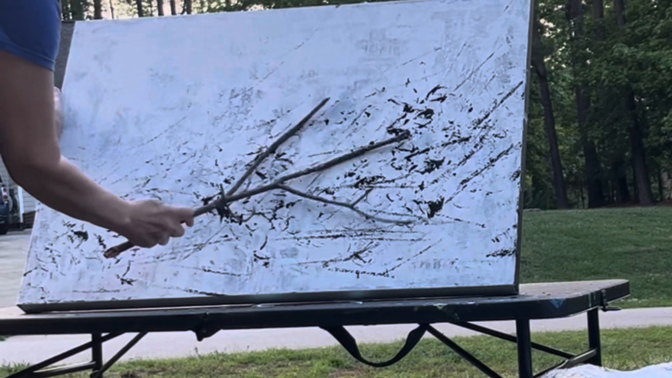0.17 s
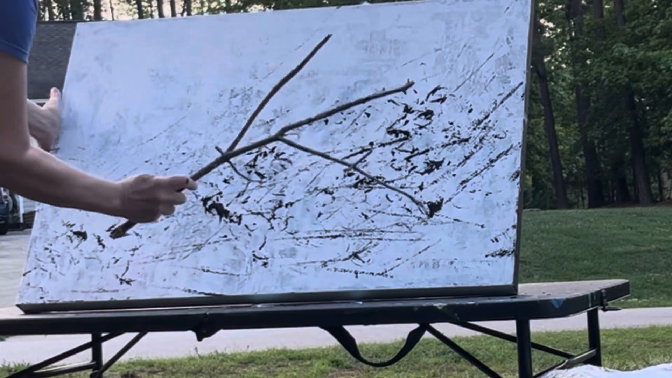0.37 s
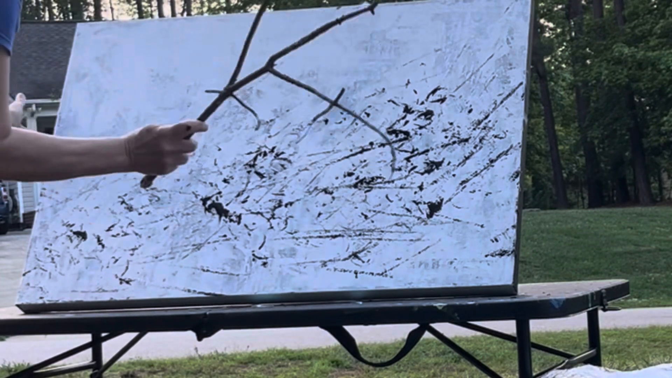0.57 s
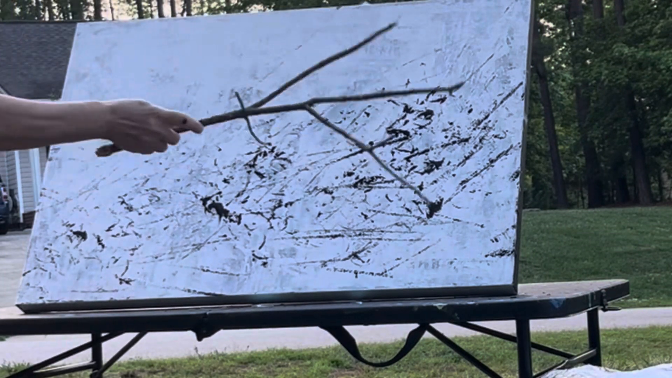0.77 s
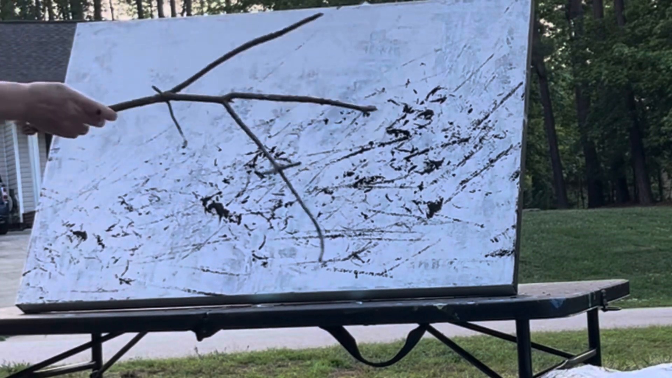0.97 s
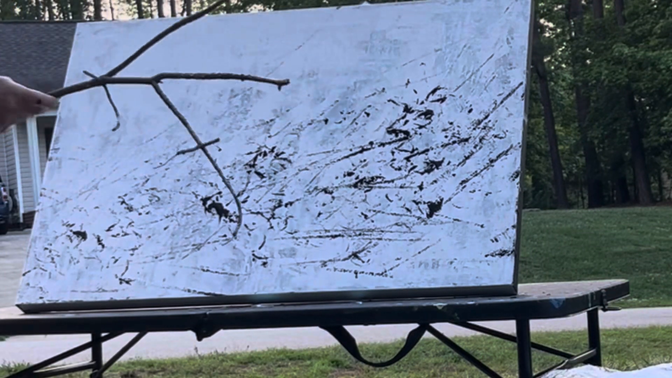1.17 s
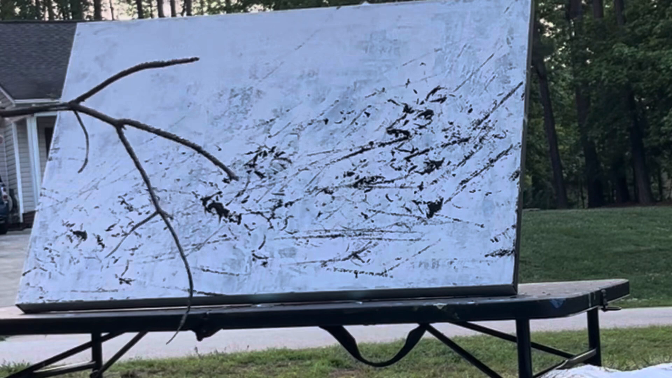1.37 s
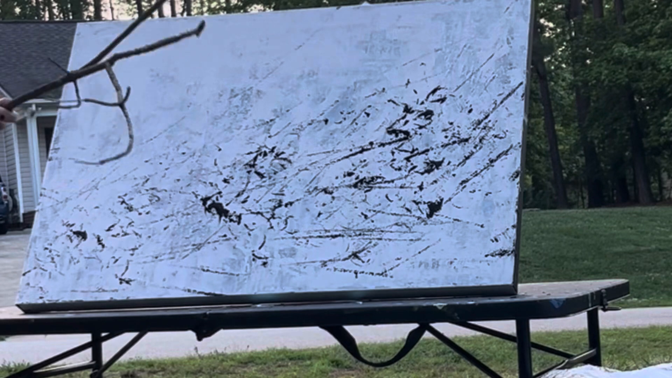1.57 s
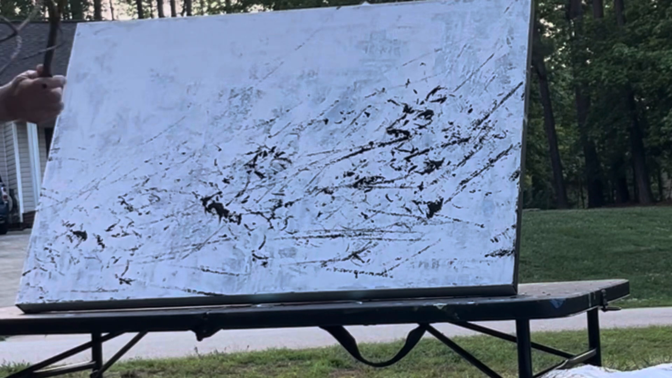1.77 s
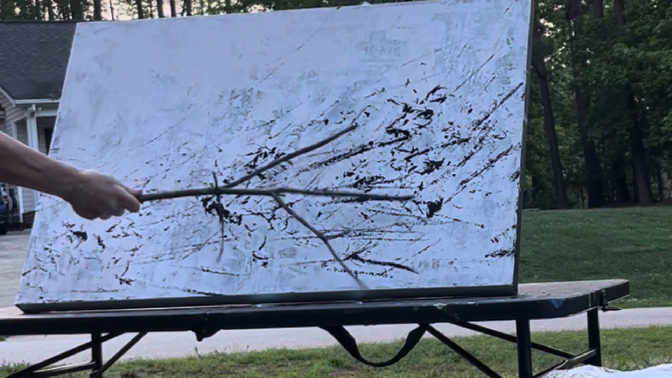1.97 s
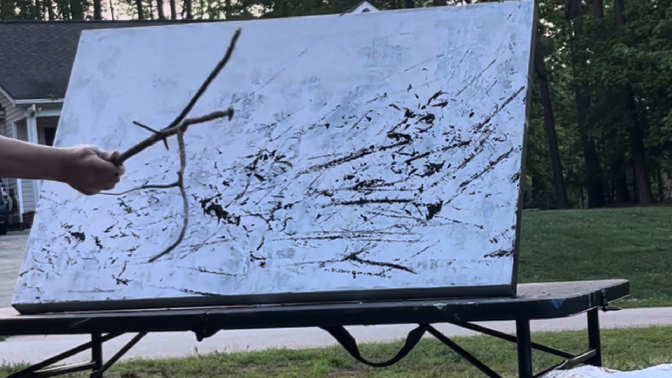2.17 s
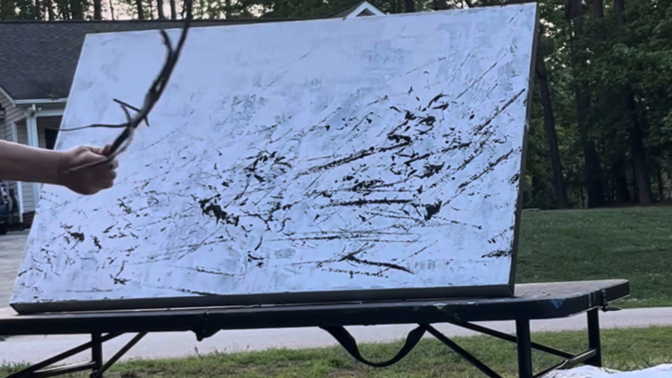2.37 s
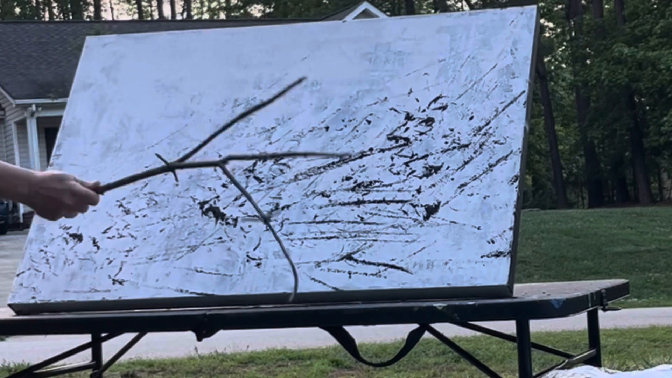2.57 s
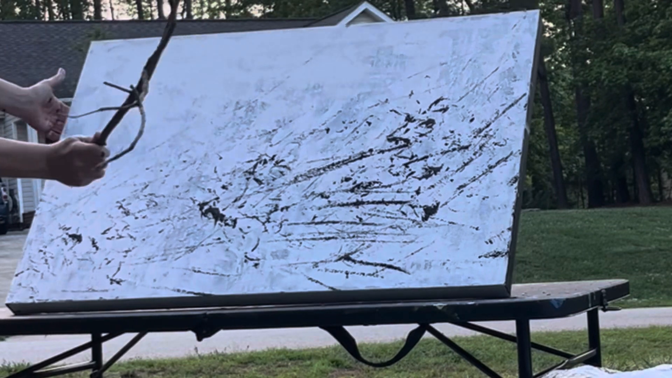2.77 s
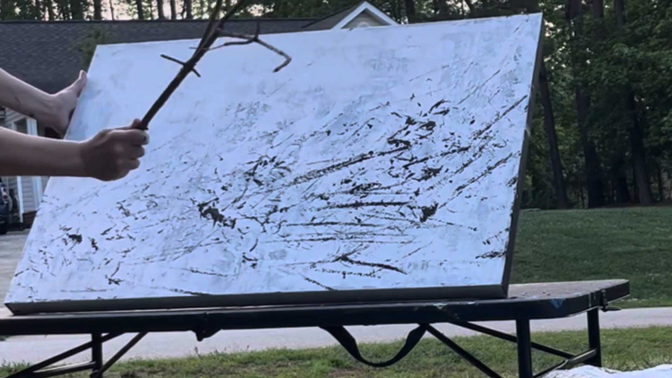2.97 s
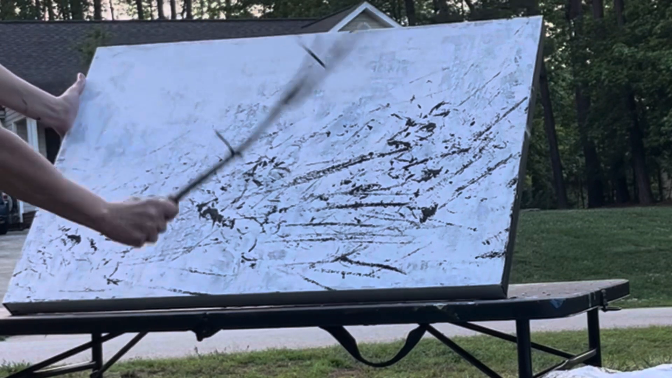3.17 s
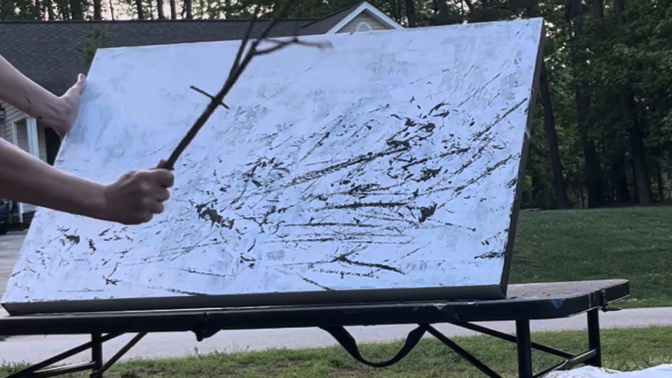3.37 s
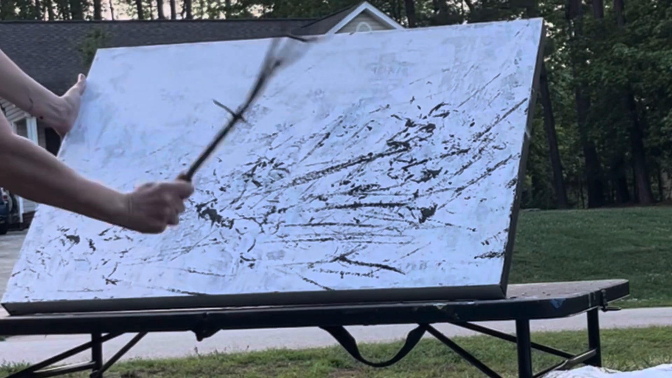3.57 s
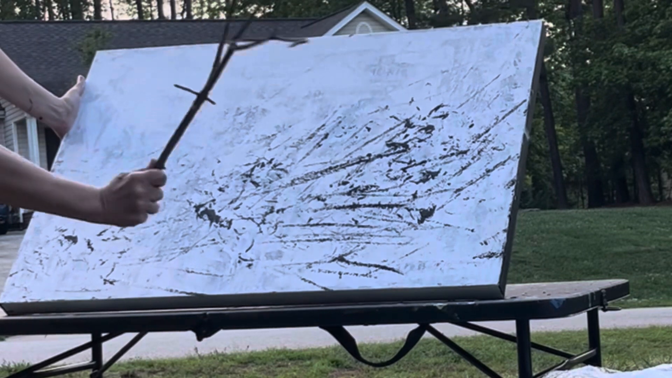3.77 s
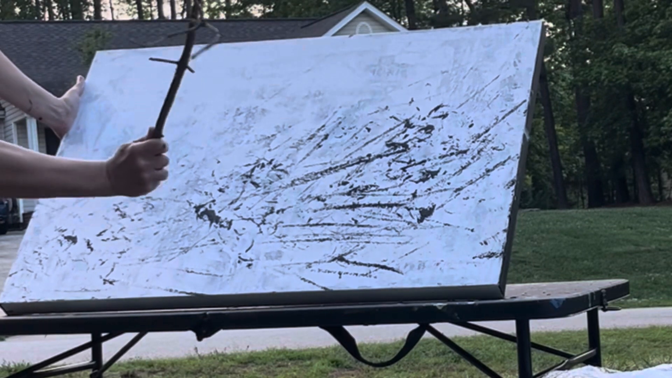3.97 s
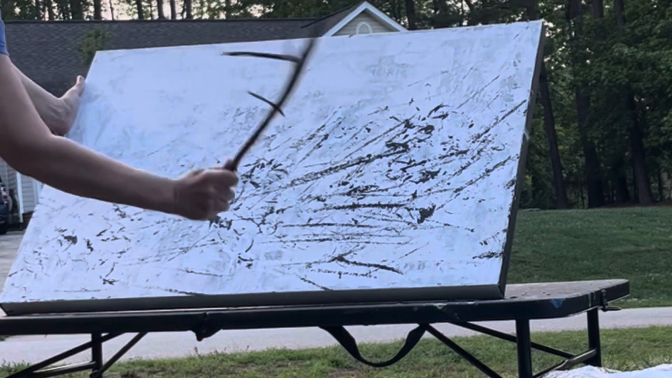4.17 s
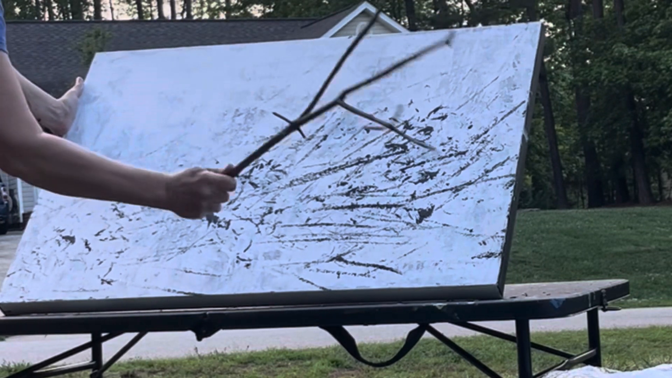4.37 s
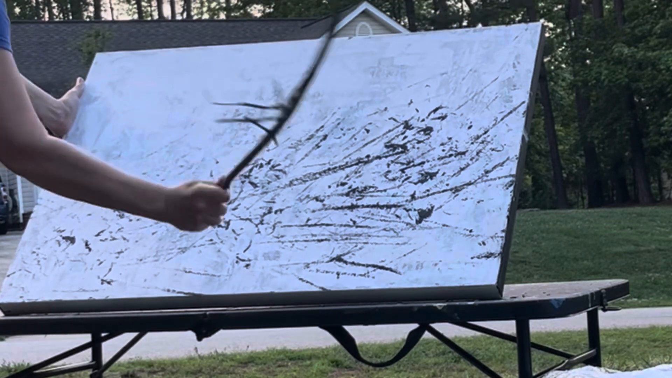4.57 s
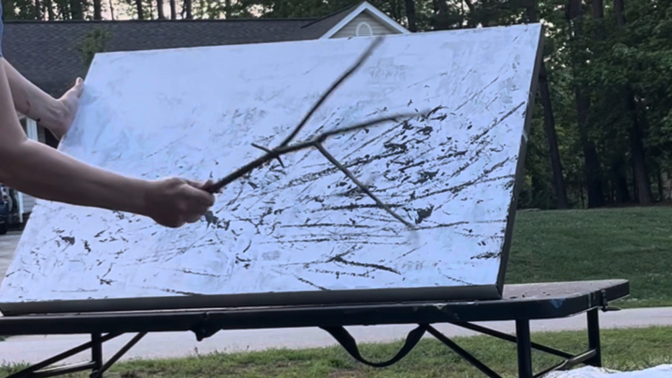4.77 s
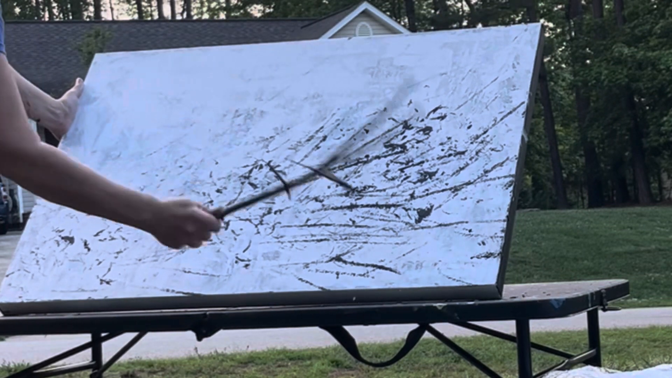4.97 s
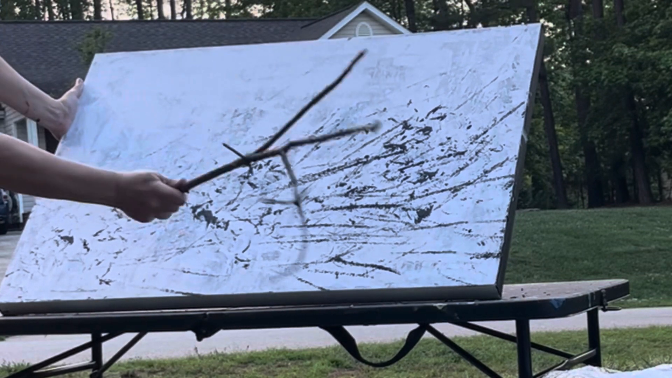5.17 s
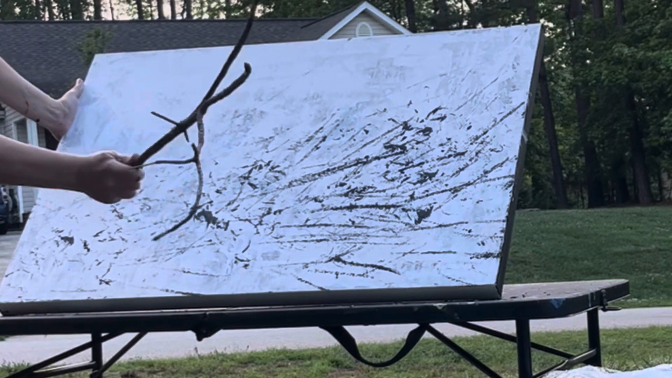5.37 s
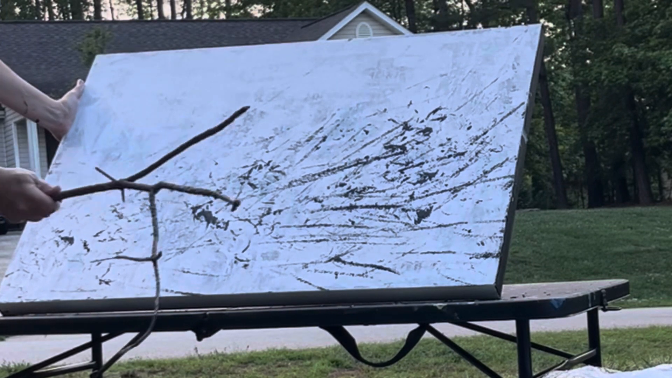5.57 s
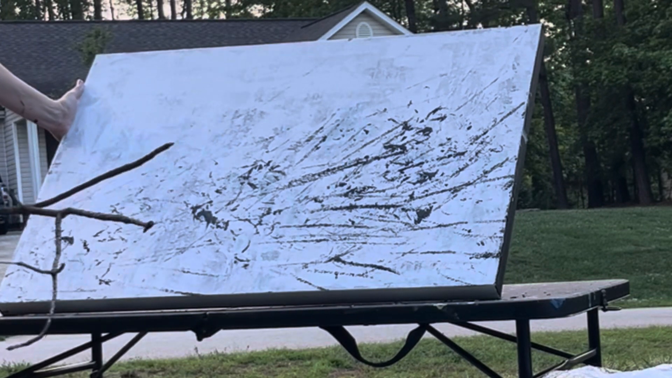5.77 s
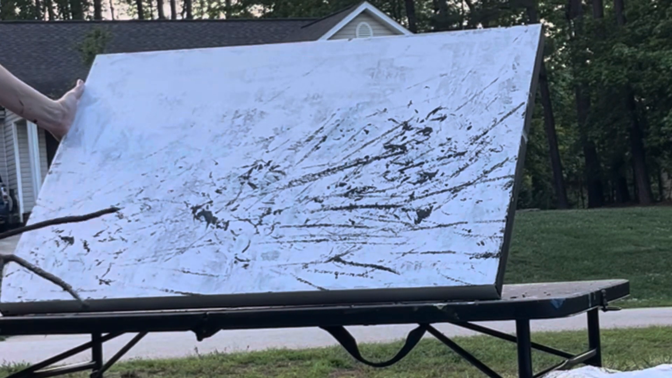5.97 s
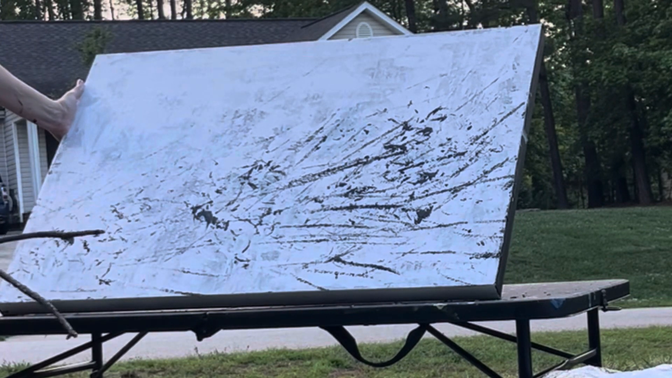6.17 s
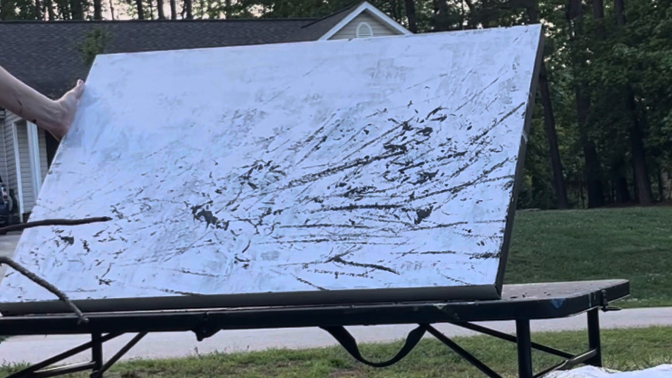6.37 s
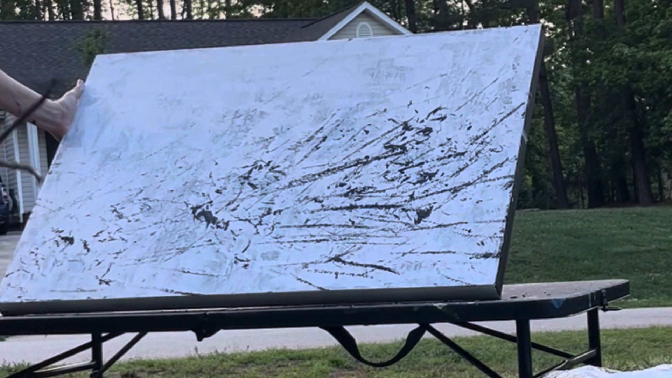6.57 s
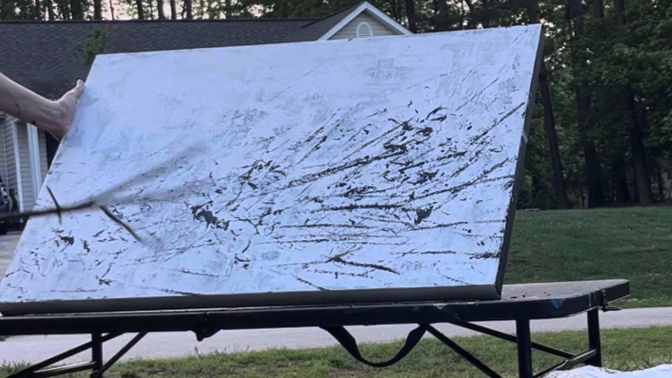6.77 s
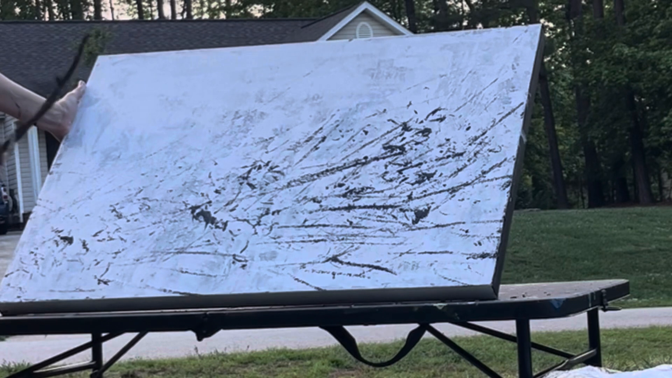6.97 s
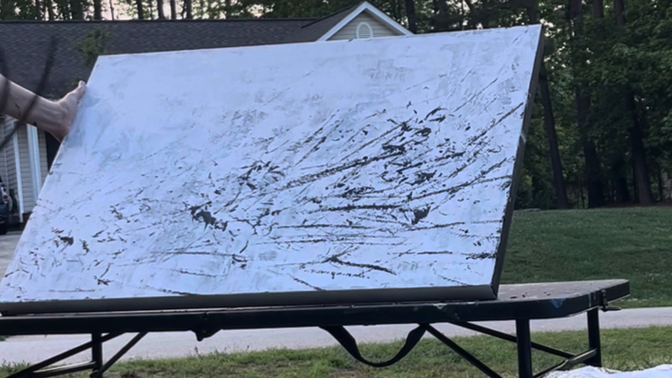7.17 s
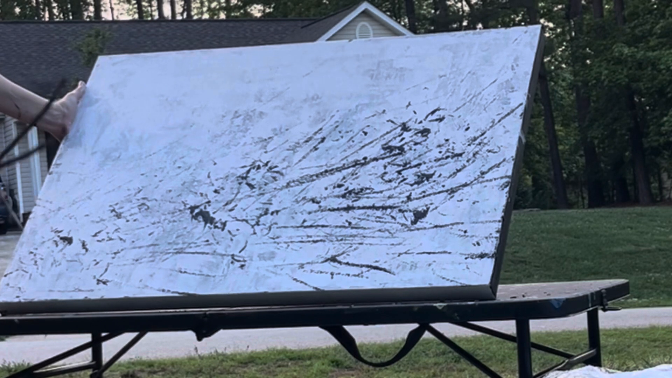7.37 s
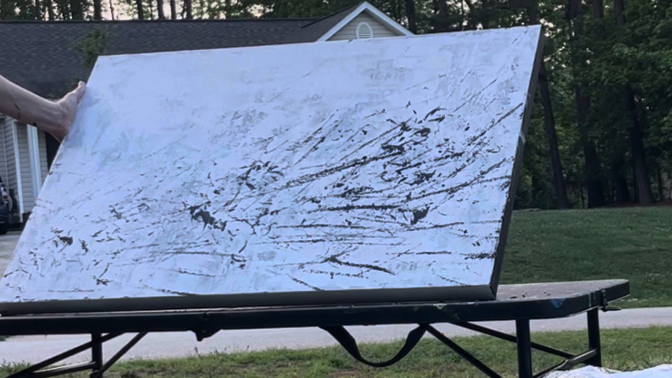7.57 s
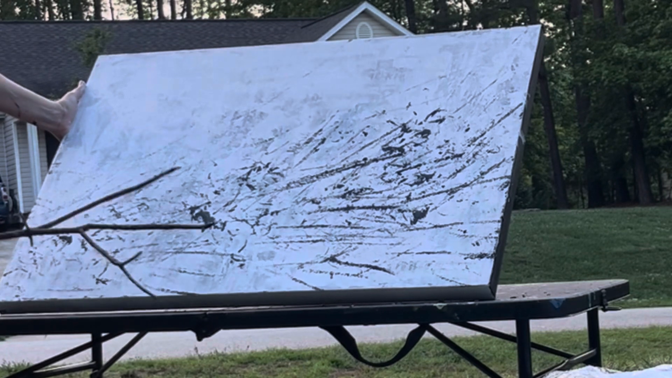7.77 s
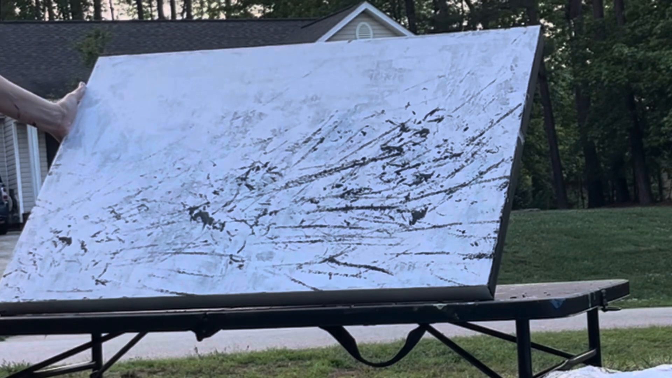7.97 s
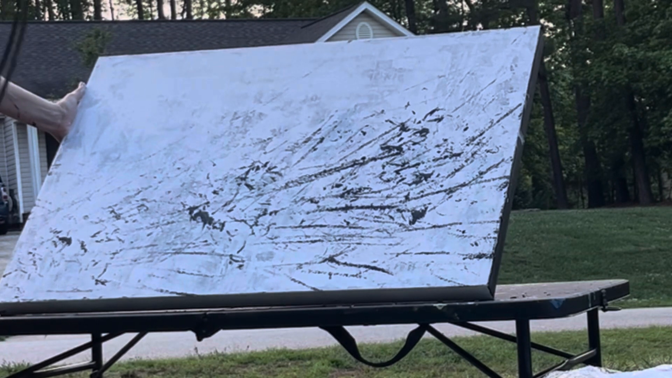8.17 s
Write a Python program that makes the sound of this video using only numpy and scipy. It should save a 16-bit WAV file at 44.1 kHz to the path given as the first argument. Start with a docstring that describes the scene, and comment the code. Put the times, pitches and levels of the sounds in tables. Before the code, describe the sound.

Outdoors, close stereo microphone. A dry forked branch whips a large taut canvas: one slap at the start, a pause, then a run of seven quick irregular hits, another pause, and three more. Each is a cluster of cracks and pops with a woody knock, a falling thump and a low drum-like ring. Echoes return from a house and trees; sparse birds whistle over soft rumble and hiss.

```python
"""Over a low outdoor rumble one hears, almost at once, a bare forked branch slap a big stretched canvas.
Eleven blows on a garden table, close by: twigs crack and pop milliseconds apart, a thicker limb knocks,
and the cloth answers with a falling thump and a ringing drum. House and trees throw the slaps back.
Birds whistle near and far, above rumble and hiss; two close microphone ports hear it all in stereo."""
import sys
import numpy as np
from scipy import signal
from scipy.fft import rfft, irfft
from scipy.io import wavfile
from scipy.ndimage import uniform_filter1d

SR = 44100
rng = np.random.default_rng(int(sys.argv[2]) if len(sys.argv) > 2 else 0)


def unload_audio(sound):
    """Save the sound as a 16-bit wav file, at the path given as the first command line argument."""
    columns = np.transpose(np.atleast_2d(sound))
    # keep every value between -1 and 1, then stretch to whole-number steps
    steps = np.round(np.clip(columns, -1, 1) * 32767)
    wavfile.write(sys.argv[1], SR, steps.astype(np.int16))


N = 362457
T = np.arange(int(1.6 * SR)) / SR  # clock of one blow, s

# Blows of the branch: start_s, second_twig_lag_s, third_twig_lag_s, pop_db, pop_pitch_hz, crack_db, scrape_db,
# knock_db, knock_pitch_hz, thump_db, thump_end_hz, drum_db, echo_treble_db
# (pop and crack before the fork's offsets, drum on top of the mode levels)
BLOWS = [(0.1431, 0.0031, 0.0084, -7.5, 917, -14, -31, -10, 550, -11.5, 78, 5.5, -3.5),
         (1.9449, 0.0042, 0.012, -2, 1110, -7, -41, -16, 458, -7.5, 134, 3, 0.5),
         (2.4443, 0.0032, 0.0073, -4, 1130, -6.5, -9, -10, 499, -11.5, 75, 5, 3),
         (3.1882, 0.0034, 0.0079, -4.5, 1130, -5.5, -15.5, -29, 425, -11, 51.7, 3, 1.5),
         (3.603, 0.0022, .0074, -5, 1075, -4.5, -22, -16, 597, -12, 54.7, 3.5, 0.5),
         (4.2157, 0.0019, 0.0059, -1.5, 1063, -7, -38, -12.5, 351, -11, 63, 4, 1),
         (4.6233, 0.0019, 0.006, -2.5, 1036, -6, -9.5, -10.5, 384, -12.5, 64.3, -1, 5.5),
         (5, .0019, 0.0063, -4.5, 1108, -7.5, -35.5, -10.5, 397, -9, 76.2, -0.5, -2.5),
         (6.787, 0.00099, .0047, -7, 1070, -7, -23.5, -22, 310, -8.5, 90, 3.5, 4.5),
         (7.224, 0.0053, 0.011, -8.5, 1090, -8.5, -6, -13, 537, -8, 127, 4, 3.5),
         (7.703, 0.0048, 0.0096, -7, 1070, -10.5, -13, -8.5, 473, -5.5, 135, 3, -1)]
# The fork's twigs in the order they land: pop_offset_db, pitch_ratio, crack_offset_db
FORK_TWIGS = [(-1.5, .97, 2.5), (-0.5, 1.017, 1.5), (-7.5, .95, -13), (-11.5, .56, -21)]
# A twig springs back and taps the cloth lightly: start_s, pop_db
SPRING_TAPS = [(0.201, -27), (3.2196, -23), (5.036, -24.5), (7.1, -45)]
# Tiny dry ticks of the twigs: start_s, level_db before the high-pass
TWIG_TICKS = [(1.42, -42), (1.535, -52)]
# The steadying hand nudges the canvas: start_s, drum_db
HAND_NUDGES = [(0.529, -22.5), (0.602, -23.5), (1.11, -14.5), (8.139, -28)]
# Drum modes of cloth and frame: pitch_hz, level_db, t60_s
DRUM_MODES = [(56.1, -32, 1.8), (80.16, -35.5, 1.5), (101.8, -36, 1.2), (126, -35, 0.82),
              (139.7, -34, 0.64), (156.3, -33.5, 0.63), (196, -35, 0.42), (211.1, -32.5, .35),
              (241.6, -31, 0.25), (268.6, -41.5, 0.45), (301, -43, 0.58), (356, -41.5, 0.34),
              (413, -39.5, 0.21), (442, -52, .24)]
# Relative colours of the crack, of the yard's echo and of the outdoor air: frequency_hz, level_db
CRACK_COLOUR = [(150, -26), (500, 4.5), (1100, 2.5), (1500, -6), (2000, 2), (2800, -6), (4400, -5.5),
                (6000, -16), (9500, -20.5), (13000, -23), (15500, -23.5), (17000, -43)]
YARD_COLOUR = [(100, 8.5), (350, 10.5), (650, -4), (1100, -5.5), (1500, -8), (2200, -0.5), (4400, 2),
               (6000, 1.5), (9000, 2.5), (13000, 4), (16000, -1.5)]
AIR_COLOUR = [(20, -31.5), (40, -4), (58, 2), (115, -3.5), (200, -12), (400, -23.5), (700, -28.5),
              (1100, -31.5), (2000, -39.5), (4200, -42), (6000, -51), (10000, -64), (16000, -68.5)]
# Reflections from house and tree line: delay_s, level_db (doubled in amplitude when used), length_s
WALL_RETURNS = [(0.074, -6.5, 0.029), (0.234, -1.5, 0.018), (0.365, -4.5, 0.033)]
# Bird notes: start_s, kind, middle_pitch_hz, level_db before the song's overall gain
BIRD_NOTES = [(.235, "chip", 7950, -48.5), (1.135, "chip", 8000, -51.5), (2.574, "slur", 3090, -45.5),
              (5.387, "arch", 4330, -48.5), (5.433, "arch", 4160, -57), (5.514, "arch", 4030, -50),
              (5.74, "slur", 3660, -56.5), (5.83, "chip", 8150, -65), (5.871, "slur", 3470, -52),
              (5.978, "lift", 4240, -54.5), (6.068, "slur", 3580, -56), (6.24, "slur", 3424, -54),
              (6.405, "slur", 3295, -61), (6.585, "lift", 4365, -52), (7.585, "lift", 3420, -51.5),
              (7.935, "rise", 4110, -55), (8.04, "flick", 6660, -53), (8.052, "rise", 4160, -55.5),
              (8.17, "lift", 3550, -48.5)]
# Shapes of bird note by kind: length_s, start_ratio, end_ratio (of the middle pitch)
NOTE_SHAPES = {"arch": (.046, .82, .7), "slur": (.062, 1.07, .72), "lift": (.055, .87, .93),
               "rise": (.043, .83, 1.15), "chip": (.024, 1.19, 1.09), "flick": (.017, 1.45, 1.55)}
# Phase by which the left port leads the right: frequency_hz, phase_rad
PORT_PHASE = [(0, 0), (150, -.2), (500, -.55), (900, -.4), (1600, -.3), (2200, .8), (2800, 1.6),
              (4000, 1.2), (5200, 1.4), (6000, 3.2), (8000, 6.3), (14600, 15.7), (16500, 17)]
# Dips in the microphone's treble: centre_hz, width_hz, depth_db
TREBLE_DIPS = [(5760, 340, -1.5), (10380, 650, -8), (14750, 450, -9)]
# Left port's share of the level difference, the right gets the opposite: frequency_hz, level_db
PORT_TILT = [(100, -.25), (500, -.25), (1100, .4), (2000, -1), (3000, -1.5), (5000, .2), (12000, .2)]

LAST_TWIG_S = .004  # the fourth twig trails the third
POP_SCATTER = 0.039  # spread of a twig's pitch from blow to blow, as a share
TAP_HZ, TAP_CRACK_DB = 1120, -3  # pitch of a tap's pop; its crack relative to the pop
TICK_HZ = 6200  # lower edge of a tick
# the thump follows the first twig, and falls more slowly the longer the branch takes to land
THUMP_LAG_S, THUMP_CYCLES_PER_S = .0012, 310
ECHO_DB, ECHO_FOLLOWS = 6.5, 0.45  # echo gain at a 0 dB pop; dB of echo per dB of pop
BIRD_WALL_S, BIRD_WALL_DB = .028, -12.5
BIRD_WOODS_DB, BIRD_WOODS_T60_S = -4.5, 0.84
# birds deep in the trees: pitch, level before woods and song gains, spread of pitch as a share
FAR_BIRD_HZ, FAR_BIRD_DB, FAR_BIRD_SPREAD = 4050, -63, .05
AIR_DB = -45.5
MIC_TREBLE_DB = 0.5  # lift reached above the first dip
TOP_HZ = 16500  # upper edge of the recorder


def twigs(pops_db=0.5, cracks_db=1):
    """The fork lands twig after twig, the third scrapes along the cloth; some taps and ticks stand apart."""
    out = np.zeros(N)
    for s, second_s, third_s, pop_db, hz, crack_db, scrape_db, *_ in BLOWS:
        lags = (0, second_s, third_s, third_s + LAST_TWIG_S)
        chances = rng.standard_normal(len(FORK_TWIGS))
        for lag, (twig_db, ratio, snap_db), chance in zip(lags, FORK_TWIGS, chances):
            pitch = hz * ratio * (1 + POP_SCATTER * chance)
            twig = contact(pitch, pop_db + twig_db + pops_db, crack_db + snap_db + cracks_db)
            add(out, s + lag, twig)
        add(out, s + third_s, undb(scrape_db) * crack(t60=0.02, rise_s=.0007))
    for s, db in SPRING_TAPS:
        add(out, s, contact(TAP_HZ, db, db + TAP_CRACK_DB))
    for s, db in TWIG_TICKS:
        add(out, s, undb(db) * cut(crack(), TICK_HZ, "high"))
    return out


def contact(hz, pop_db, crack_db):
    """A twig meets the cloth with a pop and a crack."""
    ring = pop(hz)
    return undb(pop_db) * ring + undb(crack_db) * crack()[:len(ring)]


def crack(t60=0.0094, rise_s=0.0005, bark_db=-25, bark_t60=0.045):
    """A twig's sharp contact, then its bark scuffing the painted cloth."""
    t = T[:SR // 20]
    decay = fade(t, t60) + undb(bark_db) * fade(t, bark_t60)
    shape = decay * (1 - np.exp(-t / rise_s))
    grit = rng.standard_normal(len(t)) ** 3 * shape  # cubing makes the noise spiky
    sound = signal.fftconvolve(grit, causal(CRACK_COLOUR))
    return sound * np.linalg.norm(shape) / np.linalg.norm(sound)


def pop(hz, peak_s=0.00073):
    """The small patch of cloth under a twig rings for a few cycles and sags in pitch as it widens."""
    t = T[:SR // 20]
    sag_s = .009  # time for the pitch to halve
    cycles = hz * sag_s * np.log1p(t / sag_s)
    return np.sin(2 * np.pi * cycles) * t / peak_s * np.exp(1 - t / peak_s)


def knocks(peak_s=0.0034):
    """The thick limb lands with the second twig; the wide patch of cloth under it rings lower and longer."""
    out = np.zeros(N)
    for s, second_s, _, _, _, _, _, knock_db, knock_hz, *_ in BLOWS:
        add(out, s + second_s, undb(knock_db) * pop(knock_hz, peak_s))
    return out


def canvas():
    """The low voice of the cloth: thump and drum at each blow, the drum alone at each nudge."""
    out = np.zeros(N)
    for s, _, third_s, *_, thump_db, end_hz, drum_db, _ in BLOWS:
        dent = undb(thump_db) * thump(THUMP_CYCLES_PER_S * third_s, end_hz)
        add(out, s + THUMP_LAG_S, dent + undb(drum_db) * drum())
    for s, db in HAND_NUDGES:
        add(out, s, undb(db) * drum())
    return out


def thump(cycles, end_hz, start_hz=750, rise_s=0.0029):
    """The dent spreads over the cloth: pitch falls as 1 / time until the wave meets the frame."""
    hz = cycles / (T + cycles / start_hz)
    # the sound dies as its pitch sinks past end_hz
    shape = (1 - np.exp(-T / rise_s)) * np.exp(-(end_hz / hz) ** 4)
    return np.sin(2 * np.pi * np.cumsum(hz) / SR) * shape


def drum(scatter_db=2, twin_db=-3):
    """Waves returning from the frame build standing modes, in a new mix at each blow."""
    hz, db, t60 = np.transpose(DRUM_MODES)
    # warp and weft pull differently, so the upper modes come in beating pairs
    hz = np.r_[hz, hz[1:]]
    db = np.r_[db, db[1:] + twin_db]
    t60 = np.r_[t60, t60[1:]]
    level, tune, phase = rng.standard_normal((len(hz), 3)).T
    hz = hz * (1 + .04 * tune)
    # the cloth is tighter while it swings wide, and its tension wavers as the held frame rocks
    tightness = .008 * (1 - fade(T, .8))
    rocking = .0012 * walk(14, len(T))
    clock = T + tightness + rocking
    rings = np.sin(2 * np.pi * (hz[:, None] * clock + phase[:, None])) * fade(T, t60[:, None])
    build = 1 - np.exp(-(T / .022) ** 2)
    return undb(db + scatter_db * level) @ rings * build


def yard(slaps, near_db=-35, near_t60=0.31, far_db=-49, far_t60=1.415):
    """Each slap scatters from table and house, then, duller and longer, from the trees."""
    out = np.zeros(N)
    walls = 0
    for delay, db, length in WALL_RETURNS:
        walls = walls + undb(db) * np.exp(-np.abs(T - delay) / length * 2)
    for s, _, _, pop_db, *_, treble_db in BLOWS:
        slap = slaps[int((s - .01) * SR):int((s + .02) * SR)]
        near = undb(near_db) * scatter(slap) * fade(T, near_t60)
        far = undb(far_db) * cut(scatter(slap), 7700, "low") * fade(T, far_t60)
        diffuse = near + far
        dull = cut(diffuse, 1800, "low", order=1)
        echo = dull * (1 + 2 * walls) + undb(treble_db) * (diffuse - dull)
        onset = 1 - np.exp(-T / 0.0023)
        add(out, s, undb(ECHO_DB + ECHO_FOLLOWS * pop_db) * echo * onset)
    return out


def scatter(slap, grain_db=3):
    """A slap returned by countless surfaces, a few of them strong; rms 1."""
    size = len(T) + len(slap) - 1
    surfaces = noise(YARD_COLOUR, size) * undb(grain_db * walk(900, size))
    # each direction hears the twigs in other steps, so mostly their broad colour survives
    power = np.abs(rfft(slap, size)) ** 2
    broad = uniform_filter1d(power, size // 36)  # about 1.2 kHz wide
    colour = np.sqrt(.5 * power + broad)
    x = irfft(rfft(surfaces) * colour, size)[:len(T)]
    return x / x.std()


def birds(song_db=-6, count=24):
    """Near birds are doubled by the house wall and blurred by the trees; of far ones only the blur arrives."""
    near, far = np.zeros(N), np.zeros(N)
    for s, kind, middle_hz, db in BIRD_NOTES:
        add(near, s, undb(db) * whistle(kind, middle_hz))
    for when, pitch in rng.random((count, 2)):
        hz = FAR_BIRD_HZ * (1 + FAR_BIRD_SPREAD * (2 * pitch - 1))
        add(far, when * N / SR, undb(FAR_BIRD_DB) * whistle("lift", hz))
    woods = rng.standard_normal(len(T)) * fade(T, BIRD_WOODS_T60_S)
    woods = woods / np.linalg.norm(woods)
    echo = undb(BIRD_WOODS_DB) * signal.fftconvolve(near + far, woods)[:N]
    add(echo, BIRD_WALL_S, undb(BIRD_WALL_DB) * near)
    return undb(song_db) * (near + echo)


def whistle(kind, middle_hz, waver=.025, flutter_db=3):
    """One bird note: a bent glide that wavers in pitch and flutters in level."""
    length, start, end = NOTE_SHAPES[kind]
    u = np.linspace(0, 1, int(length * SR))
    glide = np.polyval(np.polyfit([0, .5, 1], [start, 1, end], 2), u)
    hz = middle_hz * glide * (1 + waver * walk(500, len(u)))
    swell = 2 * np.sqrt(u * (1 - u)) * undb(flutter_db * walk(150, len(u)))
    return swell * np.sin(2 * np.pi * np.cumsum(hz) / SR)


def air():
    """A distant rumble that wavers under a smooth hiss, both cut from one coloured noise."""
    x = noise(AIR_COLOUR, N)
    low = cut(x, 300, "low", order=1)
    waver_db = 1.2 * walk(12) + .8 * walk(2.8)
    return undb(AIR_DB) * (x - low + low * undb(waver_db))


def patchy(x, depth_db, rate, count=7):
    """Let each octave of a sound swell and sink on its own; the top band stays steady."""
    out = 0
    for hz in 300 * 2 ** np.arange(count - 1):
        band = signal.sosfiltfilt(signal.butter(3, hz, fs=SR, output="sos"), x)
        out = out + band * undb(depth_db * walk(rate, len(x)))
        x = x - band
    return out + x


def ports(front, around):
    """Frontal sound reaches the ports out of step; sound from around differs between them except in the bass."""
    hz = np.fft.rfftfreq(N, 1 / SR)
    turn = np.exp(.5j * np.interp(hz, *np.transpose(PORT_PHASE)))  # half the phase to each port
    tilt = gains(PORT_TILT, hz)
    side = cut(around, 380, "high", order=1)
    left = irfft(rfft(front + side) * turn * tilt, N)
    right = irfft(rfft(front - side) / turn / tilt, N)
    return np.array([left, right])


def microphone(x):
    """The narrow ports lift the treble and carve a few dips into it."""
    hz = np.fft.rfftfreq(N, 1 / SR)
    db = MIC_TREBLE_DB * np.clip(hz / TREBLE_DIPS[0][0] * 2 - 1.5, 0, 1)
    for dip_hz, width_hz, dip_db in TREBLE_DIPS:
        db = db + dip_db * np.exp(-((hz - dip_hz) / width_hz) ** 2)
    return irfft(rfft(x) * undb(db), N)


def undb(db):
    """Decibels to gain."""
    return 10 ** (np.asarray(db) / 20)


def fade(t, t60):
    """Exponential decay, 60 dB in t60 seconds."""
    return np.exp(-np.log(1000) * t / t60)


def add(out, s, x):
    """Mix x into out from time s in seconds."""
    i = int(s * SR)
    out[..., i:i + x.shape[-1]] += x[..., :N - i]


def gains(points, hz):
    """Read a spectrum on a log-frequency axis."""
    f, db = np.transpose(points)
    return undb(np.interp(np.log(hz + 1), np.log(f), db))


def noise(points, size):
    """Noise of rms 1 in the given colour."""
    spectrum = rfft(rng.standard_normal(size))
    x = irfft(spectrum * gains(points, np.fft.rfftfreq(size, 1 / SR)), size)
    return x / x.std()


def causal(points, size=512):
    """Minimum-phase impulse response with the given colour, energy 1."""
    cepstrum = irfft(np.log(gains(points, np.fft.rfftfreq(size, 1 / SR))))
    folded = 2 * cepstrum * (np.arange(size) < size // 2)
    h = irfft(np.exp(rfft(folded) - cepstrum[0]))
    return h / np.linalg.norm(h)


def cut(x, hz, kind, order=2):
    """Low- or high-pass."""
    return signal.sosfilt(signal.butter(order, hz, kind, fs=SR, output="sos"), x)


def walk(rate, size=N):
    """Random drift between normal draws, rate of them per second."""
    steps = np.arange(size) / SR * rate
    knots = int(steps[-1]) + 2
    return np.interp(steps, np.arange(knots), rng.standard_normal(knots))


def scene():
    """Slaps and cloth close in front, the garden all around."""
    slaps = twigs()
    echo = patchy(yard(slaps), depth_db=2, rate=40)
    garden_air = patchy(air(), depth_db=0.8, rate=7.3)
    front = slaps + knocks() + canvas() + echo + birds() + garden_air
    around = undb(-5.5) * cut(yard(slaps) + air(), 7000, "low")
    # twigs land all over the wide canvas, so part of their crack comes from the sides
    around = around + undb(-14) * cut(twigs(), 1800, "high")
    return ports(front, around)


def record(dry, ceiling=1.0):
    """The recorder colours the treble, rounds off the loudest peaks and cuts the top."""
    x = microphone(dry)
    rounded = x / (1 + (x / ceiling) ** 4) ** (1 / 4)
    return signal.sosfilt(signal.ellip(8, .2, 70, TOP_HZ, fs=SR, output="sos"), rounded)


dry = scene()
out = record(dry)
unload_audio(out)
```